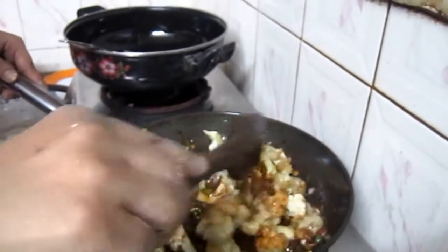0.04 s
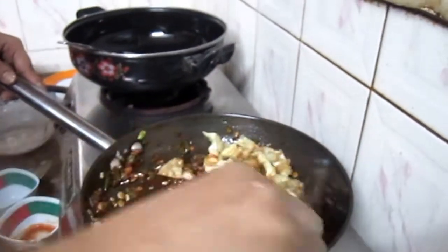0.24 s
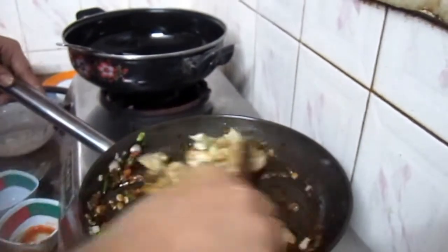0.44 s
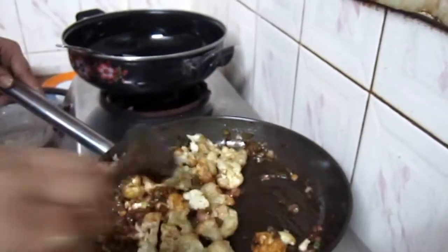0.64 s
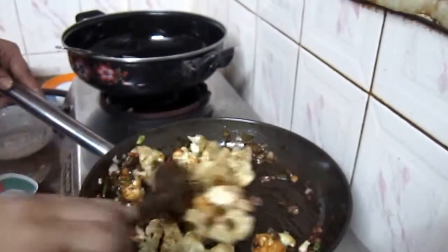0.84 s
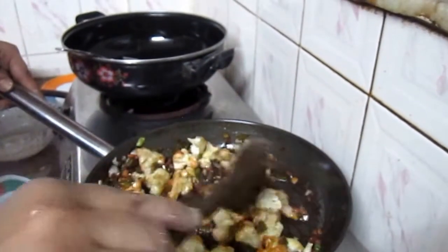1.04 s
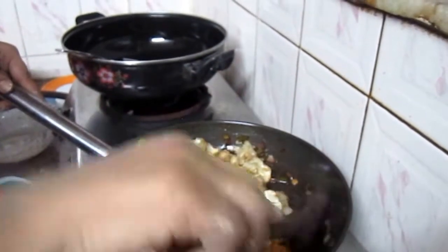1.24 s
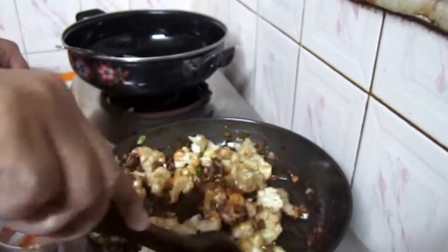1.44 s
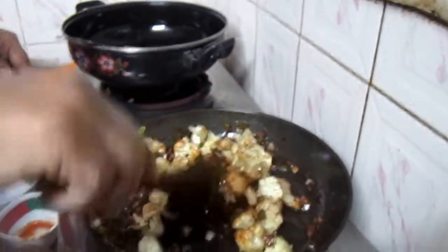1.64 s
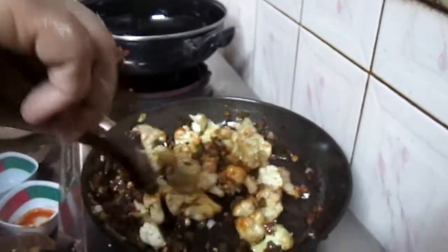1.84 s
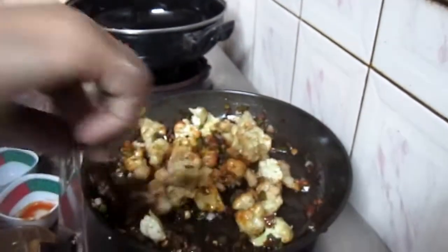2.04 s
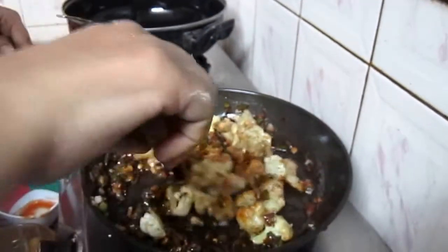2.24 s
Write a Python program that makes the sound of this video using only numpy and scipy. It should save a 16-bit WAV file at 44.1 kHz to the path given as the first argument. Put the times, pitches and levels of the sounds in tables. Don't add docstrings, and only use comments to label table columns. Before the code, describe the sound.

A wooden spatula knocks three times on a metal frying pan over faintly sizzling food

```python
import sys
import numpy as np
from scipy import signal
from scipy.fft import rfft, irfft
from scipy.io import wavfile
from scipy.ndimage import uniform_filter1d

SR = 44100
rng = np.random.default_rng(int(sys.argv[2]) if len(sys.argv) > 2 else 0)


def to_wav(s):
    ch = np.atleast_2d(s).T
    pcm = np.round(np.clip(ch, -1, 1) * 32767)
    wavfile.write(sys.argv[1], SR, pcm.astype(np.int16))


def invert_db(x):
    u = np.asarray(x, float) / 20
    return 10 ** u


N = 101429


def evened(x):
    return x / np.sqrt(np.mean(x ** 2) + 1e-20)


def read(points, hz):
    point_hz, value = np.transpose(points)
    return np.interp(np.log(hz + 1), np.log(point_hz + 1), value)


def over_time(time_s, value):
    return np.interp(np.arange(N) / SR, time_s, value)


def add(mix, start_s, sound):
    part = mix[round(start_s * SR):][:len(sound)]
    part += sound[:len(part)]


def highpass(hz):
    return signal.butter(2, hz, "high", fs=SR, output="sos")


def colour(x, points, tilt_db_per_octave=0.):
    hz = np.fft.rfftfreq(len(x), 1 / SR)
    gain_db = read(points, hz) + tilt_db_per_octave * np.log2((hz + 50) / 2000)
    return irfft(rfft(x) * invert_db(gain_db), len(x))


def patchy(points, patchy_db):
    hz = np.fft.rfftfreq(1024, 1 / SR)
    real, imag, patches = rng.standard_normal((N // 256 + 5, 513, 3)).T
    patches = uniform_filter1d(patches, size=12, axis=0)
    patches = evened(uniform_filter1d(patches, size=10, axis=1))
    z = (real + 1j * imag) * invert_db(read(points, hz)[:, None] + patchy_db * patches)
    return evened(signal.istft(z, nperseg=1024, noverlap=768)[1][:N])


def ring(hz, t60_s, level_db, rise_s):
    t = np.arange(0, .5, 1 / SR)
    decay = invert_db(level_db - 60 * t / t60_s)
    return decay * (1 - np.exp(-t / rise_s)) * np.sin(2 * np.pi * hz * t)


def hum():
    # freq_hz, density_db_per_hz
    hum_spectrum = [(28, -34), (45, -9), (120, -9), (250, -10.5), (400, -9), (1100, -9), (3000, -20.5),
                    (9000, -32.5)]
    # freq_hz, width_hz, level_db
    booms = [(49.5, 15, -62), (96, 32, -64), (176.5, 42, -60), (203, 13, -61), (299, 17, -61.5),
             (335.4, 6.8, -59), (416.5, 25, -55.5), (501, 19, -62), (585, 12, -66.5)]
    # time_s, level_db
    flame = [(0, 0.5), (.12, 0), (.45, -2.), (.9, 0), (1.4, 0.44), (1.65, -.5), (1.88, 1), (2.3, -0.2)]
    hum_db = -48.5
    out = invert_db(hum_db) * patchy(hum_spectrum, patchy_db=0.95)
    for hz, width_hz, level_db in booms:
        radius = np.exp(-np.pi * width_hz / SR)
        poles = [1, -2 * radius * np.cos(2 * np.pi * hz / SR), radius * radius]
        boom = signal.lfilter([1, 0, -1], poles, rng.standard_normal(N))
        out = out + invert_db(level_db) * evened(boom)
    return out * invert_db(over_time(*np.transpose(flame)))


def oil_pops():
    pops_per_s, spread_db = 1600, 4
    size_db = spread_db * np.minimum(rng.exponential(1, N), 4)
    pops = invert_db(size_db) * (rng.random(N) < pops_per_s / SR)
    kind = rng.integers(0, 12, N)
    out = np.zeros(N)
    for k, hz in enumerate(np.geomspace(3000, 14000, 12)):
        pop = ring(hz, 8 / hz + .0008, 0, .0001)[:400]
        out += signal.oaconvolve(pops * (kind == k), pop)[:N]
    return out


def wood_rub(stir_excess_db):
    # freq_hz, density_db_per_hz
    scrape = [(300, -25), (800, -9), (1500, -2), (3500, -8), (6000, -11), (12000, -40)]
    scrape_db, db_per_stir_db = -58.5, 1.6
    return invert_db(scrape_db + db_per_stir_db * stir_excess_db) * patchy(scrape, patchy_db=4.0)


def sizzle():
    # time_s, level_db, fine_spray_db
    stir = [(0, -54, 0), (.12, -53, 1.5), (.2, -53.5, -4.5), (.38, -51.5, -1.2), (.5, -52.5, -5.5),
            (.63, -56.5, -0.5), (.84, -53.5, -1.7), (.885, -50.5, 1), (.92, -49, 1.5), (.945, -54.5, 1.8),
            (1.2, -55, 0.4), (1.45, -52.5, 1.2), (1.58, -49.5, 0.5), (1.68, -53.5, 1.5), (1.9, -54, 1.5),
            (2.15, -49.5, -1), (2.21, -47, -1.5), (2.3, -49, -1)]
    # freq_hz, density_db_per_hz
    fizz_spectrum = [(900, -23), (2000, -6.5), (3500, -3.5), (6000, -3), (8500, -7), (11000, -9.5),
                     (13000, -17.5), (15700, -24)]
    fizz_db, pops_db, flicker_db, spray_hz = 2.5, -9.5, 0.77, 9200
    time_s, level_db, spray_db = np.transpose(stir)
    stir_db = over_time(time_s, level_db)

    fizz = patchy(fizz_spectrum, patchy_db=1.0)
    fizz = fizz + invert_db(pops_db) * evened(colour(oil_pops(), fizz_spectrum))
    spray = signal.sosfiltfilt(highpass(spray_hz), fizz)
    fizz = fizz + (invert_db(2 * over_time(time_s, spray_db)) - 1) * spray

    flicker = uniform_filter1d(rng.standard_normal(N), size=500)
    flicker = evened(uniform_filter1d(flicker, size=300))
    fizz = invert_db(fizz_db + stir_db + flicker_db * flicker) * fizz
    return fizz + wood_rub(stir_db - level_db.mean())


def bumps():
    # start_s, peak_db, pitch_hz
    thuds = [
        (0.124, -35.5, 297),
        (1.985, -43, 910),
        (2.037, -33, 402),
        (2.111, -42, 450),
        (2.286, -33, 347),
    ]
    out = np.zeros(N)
    for start_s, peak_db, hz in thuds:
        add(out, start_s, ring(hz, 0.025, peak_db + 1, .0015))
    return out


def knock(place, crack_db, crack_hz, clatter_db, tilt_db_per_octave):
    # freq_hz, t60_s, rim_db, base_db, wall_db
    pan = [(981, 0.11, -26.5, -36, -31), (1019.4, 0.14, -18, -35, -27.5), (1395, 0.15, -28.5, -45, -44),
           (1450, 0.14, -24, -35, -39), (1758, 0.19, -33, -39, -31.5), (1837, 0.12, -33, -61, -41),
           (1850, 0.093, -32, -38.5, -41), (2466, 0.24, -39, -50, -40.5), (2886, 0.061, -17, -34, -26.5),
           (2960, 0.033, -23, -30, -30), (3110, 0.1, -29, -44, -41), (3650, 0.04, -35, -44, -52),
           (4240, 0.19, -44, -56, -61), (5300, 0.073, -44, -52, -42.5),
           (1004, 0.26, -31.5, -42, -32.5), (1042.6, 0.21, -27, -37, -29.5), (1449, 0.13, -31, -42, -42),
             (2800, 0.11, -30, -50, -39), (3750, .15, -29, -46, -56), (4260, 0.083, -32, -62, -54),
             (7050, 0.033, -33, -54, -48)]
    # freq_hz, t60_s, rim_db, base_db, wall_db
    grate = [(205.6, .2, -45, -36, -57), (285.8, 0.38, -42.5, -37, -41.5), (458, 0.34, -32.5, -31, -49),
             (502.5, 0.3, -37, -30, -46), (518.4, 0.35, -39, -33, -47), (551.6, 0.2, -34.5, -34.5, -44),
             (602, 0.35, -33, -36.5, -53)]
    # freq_hz, density_db_per_hz
    clatter_spectrum = [(120, -30), (300, -15.5), (900, -14), (2000, -12), (3700, -10.5), (4800, -15.5),
                        (7500, -31), (12000, -52)]
    crack_t60_s, clatter_t60_s, clatter_rise_s = 0.0063, 0.058, 0.00083
    pan_rise_cycles, grate_rise_cycles = 3.3, 5.7

    t = np.arange(0, .5, 1 / SR)
    out = ring(crack_hz, crack_t60_s, crack_db + 0.5, 0.00043)
    clatter = evened(colour(rng.standard_normal(len(t)), clatter_spectrum, tilt_db_per_octave))
    decay = invert_db(clatter_db - 60 * t / clatter_t60_s)
    out = out + clatter * decay * np.minimum(t / clatter_rise_s, 1)
    for modes, rise_cycles in ((pan, pan_rise_cycles), (grate, grate_rise_cycles)):
        for hz, t60_s, *place_db in modes:
            out = out + ring(hz, t60_s, place_db[place], rise_cycles / hz)
    return out


def pings():
    # start_s, level_db, pitch_hz, t60_s
    hits = [
        (.406, -54, 12400, .16),
        (.476, -52, 11700, 0.1),
        (.96, -55, 12400, .07),
    ]
    out = np.zeros(N)
    for start_s, level_db, hz, t60_s in hits:
        add(out, start_s, ring(hz, t60_s, level_db, 0.00086))
    return out


def spits():
    # start_s, peak_db, pitch_hz
    bursts = [
        (.408, -73, 10000),
        (.500, -44, 12000),
        (.863, -34, 9200),
        (0.897, -33.5, 8000),
        (1.462, -40, 12000),
        (1.577, -44, 11000),
        (2.208, -34, 6000),
        (2.256, -34, 5950),
    ]
    out = np.zeros(N)
    for start_s, peak_db, hz in bursts:
        add(out, start_s, ring(hz, 0.00079, peak_db + 12, .00005) + ring(hz * 1.26, .002, peak_db, .0001))
    return out


def kitchen(x):
    # freq_hz, t60_s
    decay_times = [(200, 0.43), (1000, 0.38), (4000, 0.26), (10000, 0.22)]
    taps = np.zeros(SR // 2)
    at = np.arange(120, len(taps) - 20, 20)
    taps[at + rng.integers(0, 20, len(at))] = rng.choice([-1., 1.], len(at))
    hz, t, z = signal.stft(taps, SR, nperseg=256)
    decay = invert_db(-60 * t / read(decay_times, hz)[:, None])
    tail = signal.istft(z * decay, SR, nperseg=256)[1]
    return signal.fftconvolve(x, tail / np.linalg.norm(tail))[:N]


def scene():
    # start_s, crack_db, crack_hz, clatter_db, tilt_db_per_octave
    knocks = [
        (.2133, -1.5, 3900, -17, 0),
        (1.2297, -21, 3870, -29, -6),
        (1.9900, -26, 3200, -28.5, -4),
    ]
    wet_db, thin_hz = -7.5, 150
    near = bumps() + pings() + spits()
    for place, (start_s, *blow) in enumerate(knocks):
        add(near, start_s, knock(place, *blow))
    near = signal.sosfilt(highpass(thin_hz), near)
    mid = near + invert_db(wet_db) * kitchen(near) + sizzle() + hum()
    return np.array([mid, mid])


def band_limit(x):
    return signal.sosfilt(signal.butter(12, 16110, fs=SR, output="sos"), x)


def record(dry):
    edge_hz, slope_hz = 15745, 30
    hz = np.fft.rfftfreq(N, 1 / SR)
    mix = irfft(rfft(dry) * np.clip((edge_hz - hz) / slope_hz, 0, 1), N)
    return band_limit(mix)


dry = scene()
out = record(dry)
to_wav(out)
```